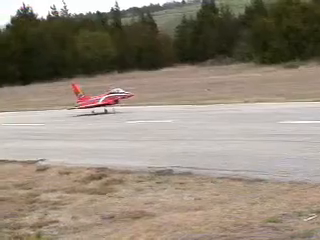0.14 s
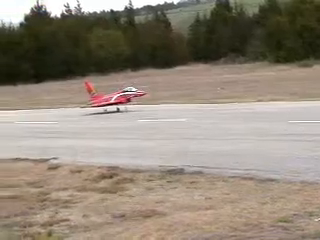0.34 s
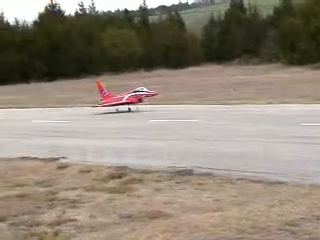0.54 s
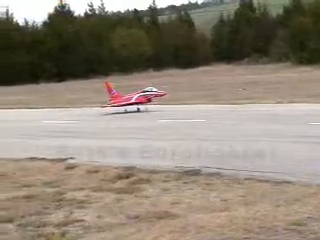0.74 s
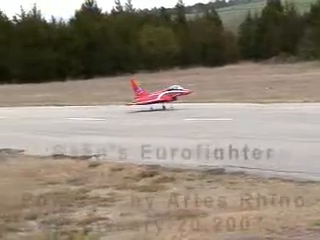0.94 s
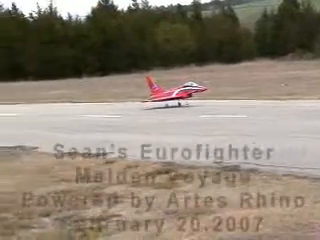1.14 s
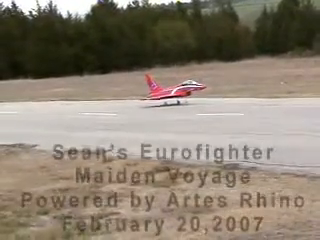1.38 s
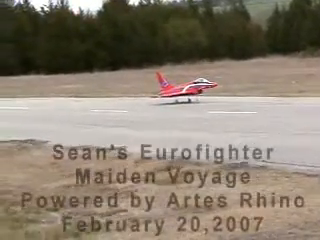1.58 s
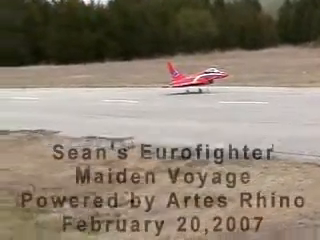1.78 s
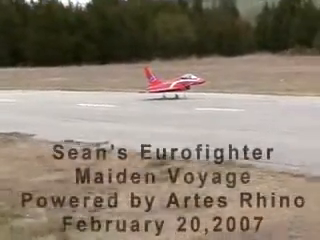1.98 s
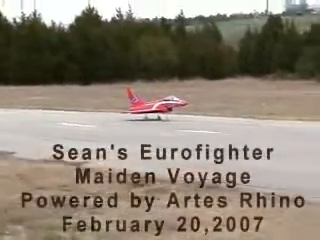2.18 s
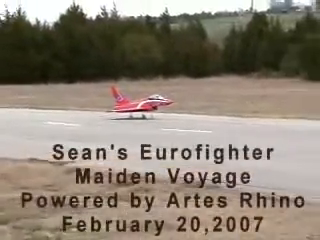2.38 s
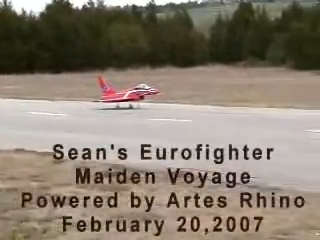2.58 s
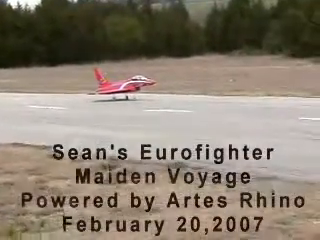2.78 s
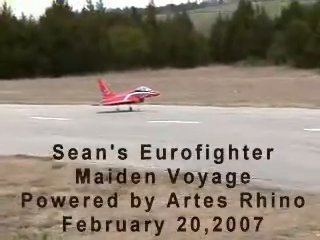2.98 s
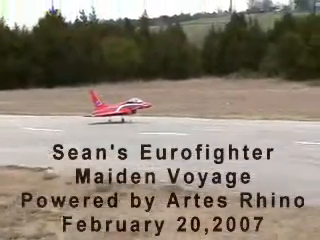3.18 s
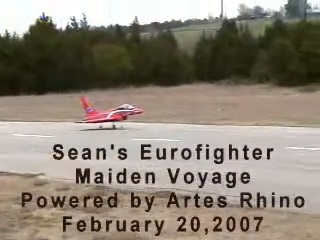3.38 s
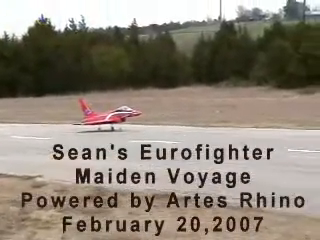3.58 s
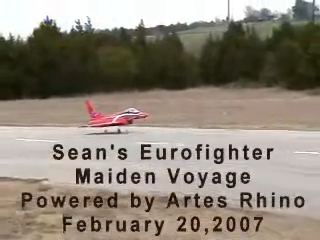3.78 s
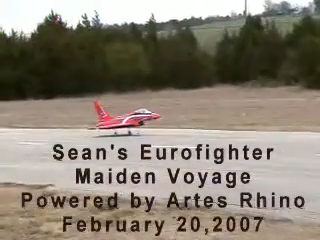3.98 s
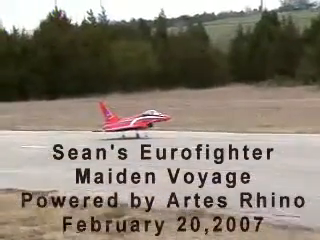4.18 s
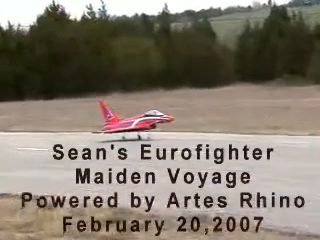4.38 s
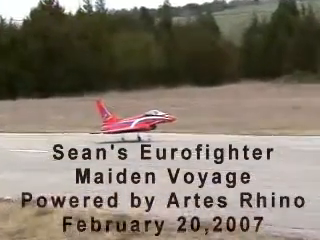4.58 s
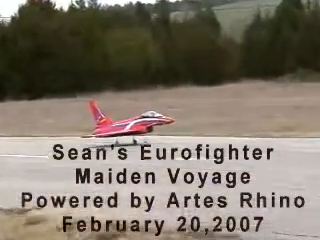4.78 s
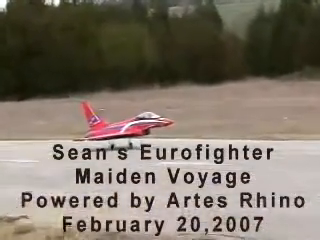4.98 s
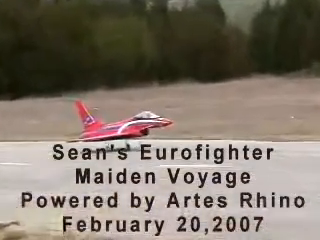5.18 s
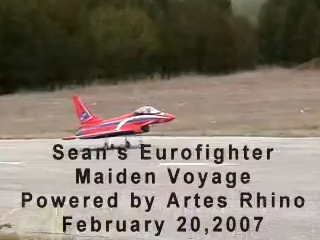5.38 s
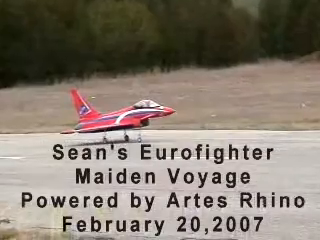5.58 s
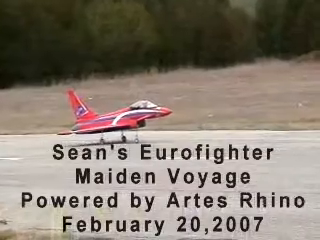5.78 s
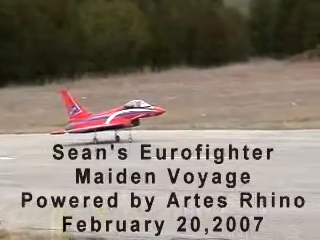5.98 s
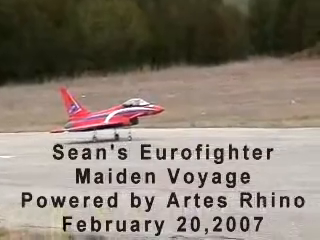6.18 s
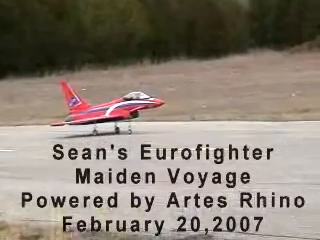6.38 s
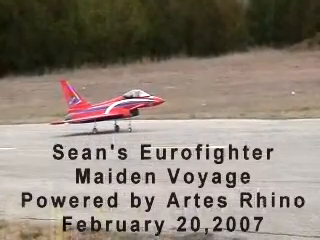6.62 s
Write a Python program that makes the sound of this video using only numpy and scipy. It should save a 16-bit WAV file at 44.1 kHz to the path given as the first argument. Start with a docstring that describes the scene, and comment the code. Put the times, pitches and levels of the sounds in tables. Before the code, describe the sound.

A small model jet turbine idles with a high whistle over rushing air, then spools up and grows into a louder roar.

```python
"""A high whistle sounds over rushing air: a model jet taxis at idle, then spools up and rolls nearer.
The compressor whistles at its blade-passing frequency, so the pitch climbs with the rotor speed.
Turbulence makes the hiss of the intake and the growing roar of the exhaust; a brief scuff is heard once.
A small camera picks it up: resonances of its microphone colour the rush, and its low sampling rate
mirrors the whistle about 8 kHz."""
import sys
import numpy as np
from scipy import signal
from scipy.fft import rfft, irfft
from scipy.io import wavfile
from scipy.ndimage import map_coordinates

SR = 44100
rng = np.random.default_rng(int(sys.argv[2]) if len(sys.argv) > 2 else 0)


def generate_wav(sig):
    """Save sig (samples, or channels by samples) to the path in sys.argv[1] as 16-bit PCM at SR."""
    pcm = np.round(np.clip(np.atleast_2d(sig).T, -1, 1) * 32767).astype(np.int16)
    wavfile.write(sys.argv[1], SR, pcm)


N = 293265
TIME = np.arange(N) / SR
HZ = np.maximum(np.arange(N // 2 + 1) * SR / N, 1)
IDLE_TURNS_PER_S = 565

# The two parts of a scuff. Each row: peak time and spread in seconds, centre and width in Hz, level in dB.
SCUFF_PARTS = [(2.781, .008, 1800, 450, -24), (2.802, .009, 2350, 1000, -23)]
# Peaks and notches of the microphone in its housing. Each row: centre in Hz, width in Hz, gain in dB.
HOUSING_RESONANCES = [(369, 550, 7.5), (532, 224, -12), (724.5, 347, 15), (786.6, 84, 4.5),
                      (1296, 90, -4.5), (1626, 560, 3), (1997, 300, -10), (2428, 790, 14), (3345, 410, 7),
                      (3770, 220, -3), (4090, 454, 12), (4500, 103, -5), (4705, 440, 7.5), (5196, 137, -27),
                      (5370, 880, 6.5), (6000, 170, -3.5)]
# Stereo width of the flow noise. Each row: frequency in Hz, side against mid in dB.
SIDE_SPECTRUM = [(60, 14), (130, -16), (400, -16.5), (800, -19.5), (1900, -13.5), (4000, -20.5),
                 (8000, -46)]
# Spectra of intake hiss, exhaust rumble and exhaust roar. Each row: frequency in Hz, relative level in dB.
HISS_SPECTRUM = [(30, -50), (90, -29), (170, -24), (280, -2), (1000, -1.5), (1700, 1), (3000, -2.5),
                 (5000, -3.5), (6300, 3), (7200, 1.5), (8000, -46), (9000, -23)]
RUMBLE_SPECTRUM = [(30, -56), (85, -36), (125, -21.5), (220, -8), (330, 0), (480, 0), (650, -13.5),
                   (1000, -46), (3000, -58)]
ROAR_SPECTRUM = [(100, -62), (350, -17), (550, -0.5), (700, -0.5), (1000, 0.5), (1700, -11), (3000, -26.5),
                 (5000, -23.5), (6400, -17), (7500, -20.5), (9000, -77)]
# The intake is loudest when it faces the listener. Each row: time in seconds, level in dB.
INTAKE_LEVEL = [(0.62, -28.5), (1.45, -25), (2.07, -26.5), (2.45, -25.5), (4.2, -24.5), (4.75, -26),
                (5.65, -22), (6.64, -22.8)]
# The exhaust swells as the jet nears and swings its tail round. Each row: time in seconds, gain in dB.
APPROACH_GAIN = [(0.62, -0.1), (1.4, 0), (2.05, -.1), (3.1, 0.1), (3.9, 0.8), (4.45, 2.1), (4.8, 3.6),
                 (5.45, 4), (6.64, 3.2)]
# Brief surges of the roar. Each row: peak time and spread in seconds, rise in dB.
ROAR_SURGES = [(0.62, .05, 3), (2.26, 0.045, 2.5), (2.87, 0.038, 3), (3.17, .05, 1.5), (4.28, 0.038, 2.5)]
# The rotor hunts round its idle, then spools up. Each row: time in seconds, speed in turns per second.
ROTOR_SPEED = [(0.6, 568.1), (1, 563.3), (1.42, 561.7), (1.9, 564.1), (2.3, 567.4), (2.75, 569.1),
               (3.3, 566), (3.7, 564.2), (4, 568.4), (4.3, 582.7), (4.6, 605.5), (5, 654.3), (5.4, 717),
               (5.7, 768.4), (6, 804.6), (6.3, 820.4), (6.65, 829)]
# Tone of the main blades, an octave below the whistle. Each row: time in seconds, level in dB.
MAIN_BLADE_LEVEL = [(0.62, -40), (1.3, -43), (3.3, -35.5), (4.1, -35), (4.75, -53), (5.2, -32), (5.5, -46),
                    (6.02, -26), (6.65, -34.5)]
# The whistle wavers in level, then dies away as its pitch climbs past 8 kHz.
# Each row: time in seconds, level in dB.
WHISTLE_LEVEL = [(0.62, -17.5), (0.76, -17.5), (1, -12.5), (1.85, -12.5), (2.02, -17.5), (2.5, -16.5),
                 (2.77, -13), (3.6, -14), (4.08, -11.5), (4.6, -13.5), (5.12, -11), (5.4, -39), (6.65, -60)]
# Brief dips of the whistle. Each row: centre time and spread in seconds, depth in dB.
WHISTLE_DIPS = [(2.22, .035, 3), (4.33, 0.042, 13.5), (4.53, 0.013, 3), (4.71, 0.013, 7), (4.765, 0.015, 7),
                (4.9, 0.048, 7)]
# Side tones of uneven blades. Each row: multiple of the rotor speed, dB against the whistle at idle.
SIDE_TONES = [(11, -30), (13, -26.5)]
# The side tones stand out as the throttle opens. Each row: peak time and spread in seconds, rise in dB.
THROTTLE_SWELL = [(4.2, 0.25, 8)]
# Direction. Each row: time in seconds, left minus right in dB for the rush, then for the whistle.
DIRECTION = [(0.6, -2.55, -2.5), (4.2, -2.4, -3), (4.35, -2.5, 0.5), (5.5, -0.9, 0.5), (6.65, -0.5, 2)]


def from_db(db):
    """Amplitude grows tenfold for every 20 dB."""
    return 10 ** (np.asarray(db) / 20)


def rms_one(x):
    """Division by the root mean square gives unit power."""
    return x / np.sqrt(np.mean(x ** 2) + 1e-20)


def in_time(rows):
    """Linear interpolation gives each column of a curve at every sample."""
    times, *columns = np.transpose(rows)
    return [np.interp(TIME, times, column) for column in columns]


def glide(rows):
    """A natural cubic spline joins the points with the least bending."""
    times, values = np.transpose(rows)
    bend = np.abs(times[:, None] - times) ** 3
    line = np.array([np.ones_like(times), times])
    system = np.block([[bend, line.T], [line, np.zeros((2, 2))]])
    *weights, offset, slope = np.linalg.solve(system, np.r_[values, 0, 0])
    return sum(w * np.abs(TIME - at) ** 3 for w, at in zip(weights, times)) + offset + slope * TIME


def pulse(at, spread):
    """A Gaussian pulse of height 1 in time."""
    return np.exp(-.5 * ((TIME - at) / spread) ** 2)


def swells(rows):
    """Gaussian pulses add to a level change in dB."""
    return sum(db * pulse(at, spread) for at, spread, db in rows)


def over_hz(points):
    """Interpolation on a log-frequency axis gives a spectrum in dB."""
    hz, db = np.transpose(points)
    return np.interp(np.log(HZ), np.log(hz), db)


def bell(hz, width_hz):
    """A resonance-shaped peak of height 1 in frequency."""
    return 1 / (1 + (2 * (HZ - hz) / width_hz) ** 2) ** 2


def noise(gain):
    """White noise takes on the spectrum of its filter."""
    return irfft(rfft(rng.standard_normal(N)) * gain, N)


def drift(rate_hz):
    """Low-passed noise is a slow random fluctuation, here of unit power."""
    return rms_one(noise(1 / (1 + (HZ / rate_hz) ** 2)))


def panned(x, pan_db):
    """A level difference between the ears sets the direction."""
    return x * from_db(pan_db * np.array([[.5], [-.5]]))


def turbulence(spectrum, flutter_db):
    """Turbulence radiates broadband noise; moving air makes it flutter and housing resonances colour it."""
    housing_db = sum(db * bell(hz, width) for hz, width, db in HOUSING_RESONANCES)
    colour_db = over_hz(spectrum) + housing_db
    mid = noise(from_db(colour_db))
    side = noise(from_db(colour_db + over_hz(SIDE_SPECTRUM)))
    return rms_one(np.array([mid + side, mid - side])) * from_db(flutter_db * drift(35))


def scuff():
    """Band-limited noise under two short envelopes is heard as a rasp."""
    return sum(from_db(db) * pulse(at, spread) * rms_one(noise(np.sqrt(bell(hz, width))))
               for at, spread, hz, width, db in SCUFF_PARTS)


def intake():
    """Turbulent flow through the ducts hisses."""
    level_db, = in_time(INTAKE_LEVEL)
    return from_db(level_db) * turbulence(HISS_SPECTRUM, flutter_db=0.43)


def exhaust(octaves_over_idle):
    """Turbulent mixing with still air: large eddies rumble, small ones roar and gain most from thrust."""
    approach_db, = in_time(APPROACH_GAIN)
    rumble_db = -27.5 + 6 * octaves_over_idle + 1.15 * approach_db
    roar_db = -20 + 13 * octaves_over_idle + 0.98 * approach_db + swells(ROAR_SURGES)
    rumble = from_db(rumble_db) * turbulence(RUMBLE_SPECTRUM, flutter_db=0.73)
    roar = from_db(roar_db) * turbulence(ROAR_SPECTRUM, flutter_db=0.5)
    return rumble, roar


def compressor(speed, octaves_over_idle, main_blades=6, all_blades=12):
    """Blade-passing frequency is blade count times rotor speed; moving air makes the tones shimmer."""
    wander_hz, shimmer_db, waver_db = 0.056, 0.38, 2.0
    main_db, = in_time(MAIN_BLADE_LEVEL)
    whistle_db, = in_time(WHISTLE_LEVEL)
    angle = 2 * np.pi * np.cumsum(speed + wander_hz * drift(11)) / SR
    # the side tones fade as the rotor speeds up
    side_db = swells(THROTTLE_SWELL) - 33 * octaves_over_idle
    side_tones = sum(from_db(db + side_db) * np.sin(multiple * angle) for multiple, db in SIDE_TONES)
    whistle_gain = from_db(whistle_db - swells(WHISTLE_DIPS) + shimmer_db * drift(30))
    whistle = whistle_gain * (np.sin(all_blades * angle) + side_tones)
    main_tone = from_db(main_db + waver_db * drift(10)) * np.sin(main_blades * angle)
    return np.sqrt(2) * (whistle + main_tone)


def scene():
    """The sources superpose, moving from the right towards the middle; one rotor drives tones and exhaust."""
    speed = glide(ROTOR_SPEED)
    octaves_over_idle = np.log2(speed / IDLE_TURNS_PER_S)
    rush_pan, whistle_pan = in_time(DIRECTION)
    rumble, roar = exhaust(octaves_over_idle)
    rush = roar + intake() + scuff()
    tones = compressor(speed, octaves_over_idle)
    return panned(rumble, pan_db=-0.8) + panned(rush, rush_pan) + panned(tones, whistle_pan)


def record(dry):
    """Aliasing and imaging: slow samples joined by straight lines mirror the treble about half the rate."""
    rate_hz, cutoff_hz, start_s = 16000, 12450, 0.602
    ticks = np.arange(0, N, SR / rate_hz)
    sampled = np.array([map_coordinates(channel, [ticks], order=3, mode="nearest") for channel in dry])
    overloaded = np.clip(sampled, -1, 1)
    softened = signal.sosfilt(signal.butter(2, 7500, fs=rate_hz, output="sos"), overloaded)
    joined = np.array([np.interp(np.arange(N), ticks, channel) for channel in softened])
    fade_in = np.clip((TIME - start_s) / .004, 0, 1)
    lowpass = signal.ellip(10, .1, 80, cutoff_hz, fs=SR, output="sos")
    return signal.sosfilt(lowpass, joined * fade_in)


dry = scene()
out = record(dry)
generate_wav(out)
```